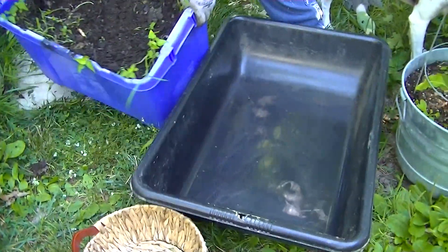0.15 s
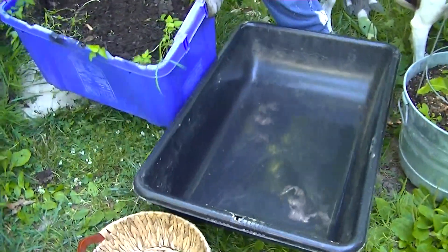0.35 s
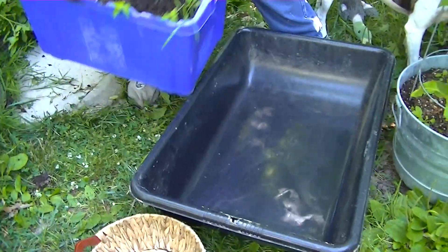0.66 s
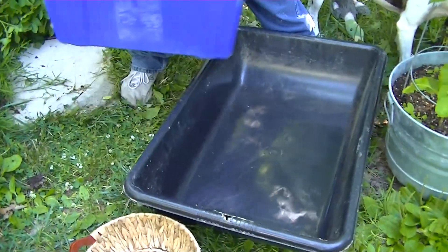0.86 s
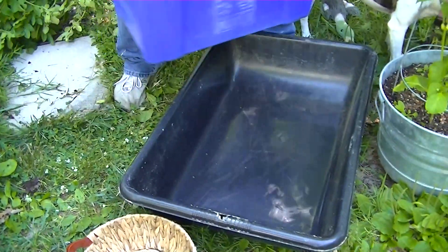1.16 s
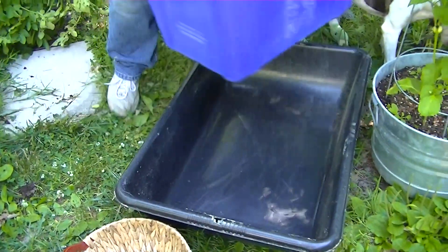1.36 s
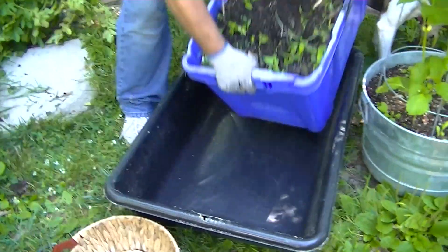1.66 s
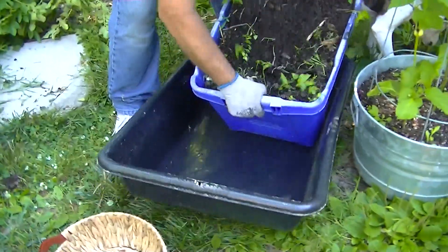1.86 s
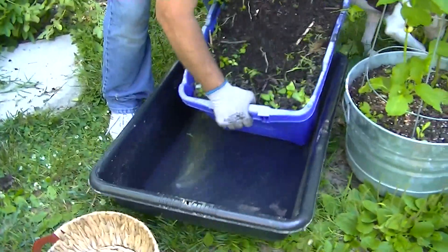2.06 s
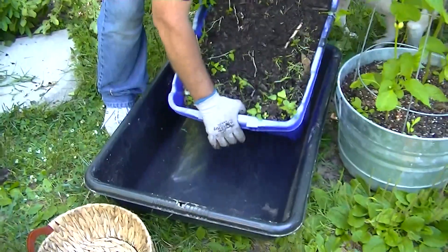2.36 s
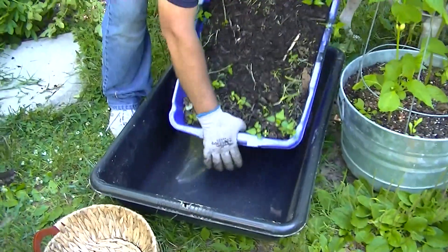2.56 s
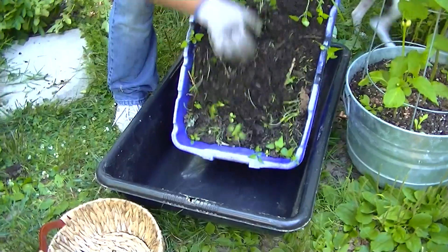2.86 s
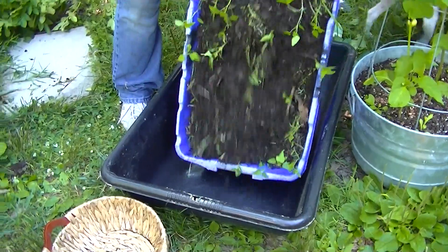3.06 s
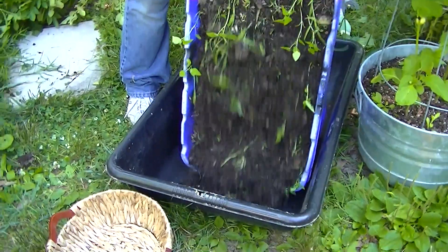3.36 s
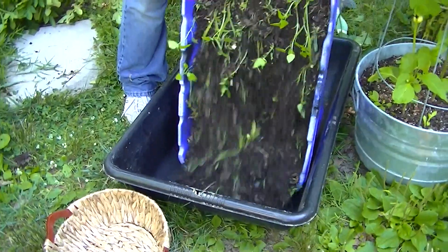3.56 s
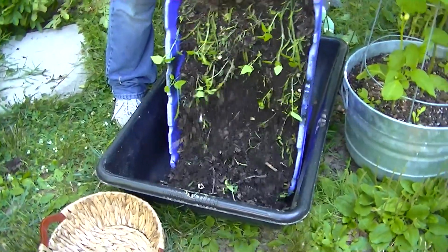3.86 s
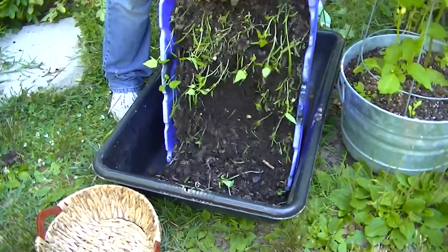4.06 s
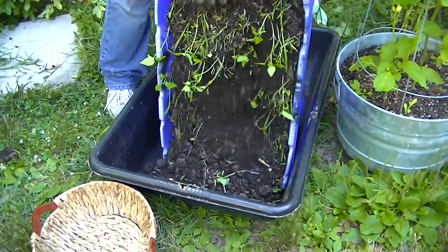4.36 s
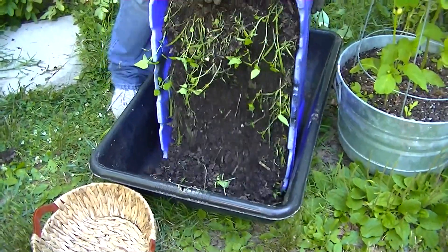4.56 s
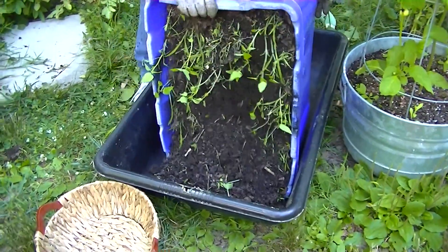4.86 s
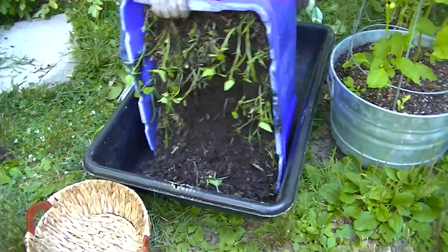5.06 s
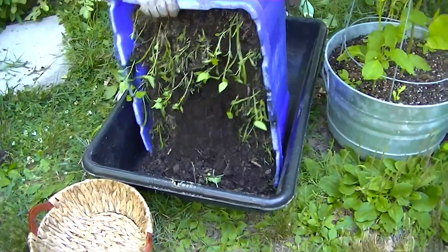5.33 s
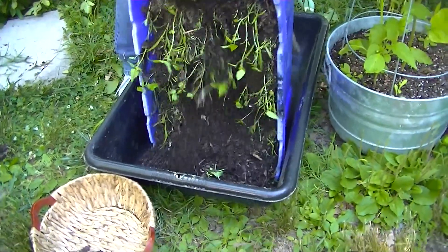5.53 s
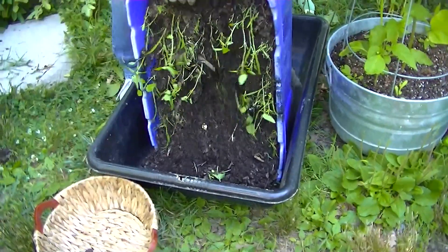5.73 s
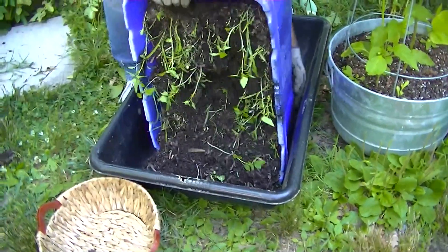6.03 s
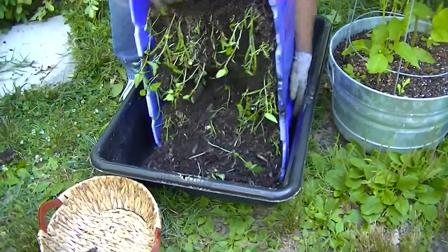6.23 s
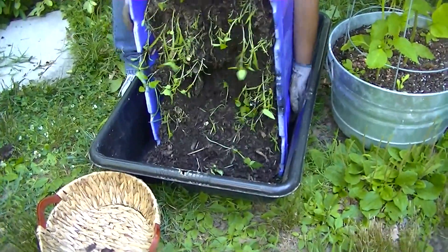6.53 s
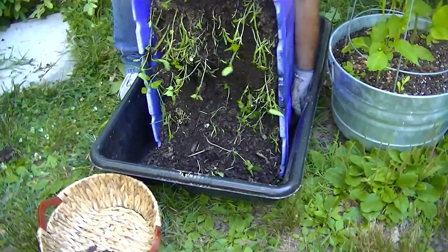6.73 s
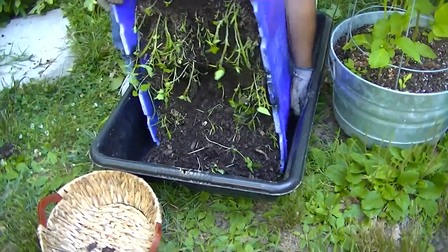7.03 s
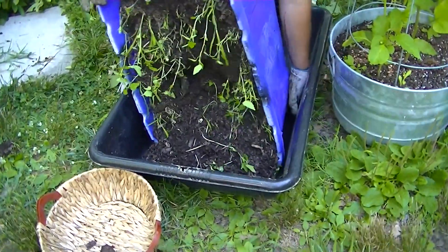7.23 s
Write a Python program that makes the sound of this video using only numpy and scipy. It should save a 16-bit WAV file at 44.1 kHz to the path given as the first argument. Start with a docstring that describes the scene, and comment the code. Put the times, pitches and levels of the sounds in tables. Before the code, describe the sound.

A plastic tote of soil bumps and thuds heavily into a plastic tub, then soil and stems slide out rustling, with one loud plastic crack.

```python
"""Tipping out soil in a garden

Close up on a lawn, a plastic tote of soil and weeds is lifted, set down in a plastic tub and tipped out.
The tub thuds as decaying wall modes, soil and stems rustle as coloured grains, and pebbles tick on the walls.
The flexing tote snaps, loudest in one crack, and scattered echoes ring around the garden.
Behind it lie still air, as shaped noise, and the wavering hum of a far machine."""
import sys
import numpy as np
from scipy import signal
from scipy.fft import rfft, irfft, next_fast_len
from scipy.io import wavfile

SR = 44100
rng = np.random.default_rng(int(sys.argv[2]) if len(sys.argv) > 2 else 0)


def put_to_file(sound):
    """Save the sound as 16-bit audio at rate SR, in the file named by the first command-line argument."""
    columns = np.atleast_2d(sound).T  # one column per channel
    safe = np.clip(columns, -1, 1)
    whole_steps = np.round(safe * 32767)
    wavfile.write(sys.argv[1], SR, whole_steps.astype(np.int16))


N = 325899
TIME = np.arange(N) / SR

# Background of the open garden. Each row: frequency in Hz, relative density in dB per Hz.
GARDEN_SPECTRUM = [(20, -14.5), (60, 0), (110, -2), (180, -7.5), (240, -7.5), (340, -4.5), (560, -10.5),
                   (820, -4), (1300, -11), (2400, -14), (4500, -17.5), (7000, -23), (11000, -37),
                   (15500, -35.5)]
GARDEN_DB, HUM_HZ, HUM_DB = -60, 119.7, -69.5

# The load gives way: lifted, landed, tipped, the bulk falling, trickling, jolted, shaken twice.
# Each row: start in seconds, hold in seconds, drain in dB per second, then levels in dB
# of leaves and crumbs, of soil, and of weight shifting against the walls.
LOAD_SLIDES = [(-.15, 0.11, 20, -67.5, -62, -59), (1.75, .02, 30, -60, -59, -56),
               (2.879, 0.631, 17, -57, -63, -64.5), (3.071, .13, 53, -62.5, -55, -57),
               (4.031, 0.11, 2.5, -62.5, -65.5, -67.5), (4.969, 0.184, 12.5, -57.5, -62, -76),
               (5.982, 0.37, 54.5, -62, -64, -67), (6.992, 0.31, 30, -63.5, -68, -76)]
SWELL_S = 0.1477
# The load never quite rests in the hands.
STIR_LEAVES_DB, STIR_SOIL_DB, STIR_WEIGHT_DB = -69.5, -72.5, -78.5
# Brief strokes of stems and soil over the plastic.
# Each row: start in seconds, length in seconds, leaves in dB, soil in dB.
PLASTIC_SWISHES = [(0.108, 0.124, -67.5, -62.5), (0.327, 0.113, -68, -68), (0.425, 0.084, -72.5, -51.5),
                   (1.286, 0.186, -62, -70), (1.457, 0.0925, -65.5, -67.5), (2.0, 0.1197, -65, -59),
                   (2.552, 0.075, -63.5, -73.5), (3.018, 0.085, -66.5, -55), (4.322, 0.1643, -54.5, -62.5),
                   (5.886, 0.0687, -57.5, -57), (5.915, 0.228, -61.5, -88), (6.14, 0.123, -68.5, -65),
                   (6.561, 0.0338, -59, -58.5), (6.76, 0.1585, -58.5, -60.5), (6.957, 0.0976, -63, -83.5),
                   (7.105, .18, -62, -71.5)]
# Colour of the weight shifting. Each row: frequency in Hz, relative density in dB per Hz.
SHIFT_SPECTRUM = [(40, -26.5), (140, -9), (230, -2.5), (320, -0.5), (480, -7), (900, -16), (3000, -36)]
# Colour of the soil grains. Each row: frequency in Hz, relative density in dB per Hz.
SOIL_SPECTRUM = [(150, -28), (500, -4), (1100, -2), (1650, 0.5), (2000, -1), (2450, -12), (3100, 0),
                 (3900, -15.5), (6000, -10), (15000, -44)]
# Colour of leaves and crumbs. Each row: frequency in Hz, relative density in dB per Hz.
LEAF_SPECTRUM = [(400, -40), (2000, -3), (4000, -3.5), (5500, -0.5), (7200, 1.5), (9000, -2), (11500, -5),
                 (15500, -16.5)]
# Fast soil makes the tote floor sing: at SING_EVEN_DB of soil, song and grains are equally loud;
# the song's level against the grains follows the soil gain to the power SING_EXPONENT.
SING_HZ, SING_WIDTH_HZ, SING_EVEN_DB, SING_EXPONENT = 1580, 480, -51.5, 1.15
# Small stones falling at random: rate, and level against leaves and crumbs.
GRIT_PER_S, GRIT_DB = 39, -14.5

# Dull blows on the tub. Each row: start in seconds, level in dB, bass in dB and treble in dB
# against the middle, pitch as a factor on the modes.
TUB_THUDS = [(0.135, -22.5, 2.5, -11, 1.1), (0.431, -18, -7.5, -21.5, 0.47), (.463, -19, -4, -24, 1.235),
             (0.494, -20, 4, -14, 1.077), (0.6463, -12.5, -2, -32, 0.73), (.654, -18, -1, -28, 1.5),
             (1.084, -26.5, -3, -11.5, 1.24), (1.7211, 8.4, 2, -20, 0.991), (1.7426, 2.5, -7, -26, 1.21),
             (1.756, -0.5, -11, -17.5, 1.15), (1.777, -7, 1.5, -2.5, 1.15), (1.794, -12, 5, -23.5, 1.1),
             (1.813, -17, -3.5, -20, 1.1), (1.995, -18, -3, 0, .95), (3.0102, -20, -14.5, -6.5, 1.9),
             (3.647, -17, 3.5, -20, 1.136), (3.873, -22.5, -6.5, -21, 1.3),
             (3.926, -19.5, -6.5, -9.5, 1.187), (5.174, -10, 6, -12, 1.05), (5.592, -22.5, 10, -4.5, 1.187),
             (5.919, -22, -0.5, -12, 1.08), (6.188, -22.5, -4.5, -1, 1.34), (6.545, -29, 5, -10.5, 0.736)]
# Modes of the loaded tub at pitch 1. Each row: frequency in Hz, level in dB, t60 in seconds.
TUB_MODES = [(92, -5.5, 0.056), (215, -48.5, 0.041), (267.9, 5.5, 0.0637), (348, -1.5, 0.04),
             (502, -2.5, 0.0482), (602.3, -4.5, 0.0565), (702.4, -2, 0.0314), (1015.4, -10.5, 0.0864),
             (1137, -21.5, 0.025), (1473, -9, 0.03)]
# A heavy blow presses the load on the wall: rattle t60 at 0 dB, and the rise in level that halves it.
TUB_RATTLE_S, CHOKE_HALVING_DB = .033, 19

# The tote rubs over the rim of the tub. Each row: start in seconds, length in seconds, level in dB.
RIM_SCRAPES = [(.44, .09, -57), (0.481, .3, -63), (.572, 0.038, -61)]
# Resonances of the rubbed wall. Each row: frequency in Hz, width in Hz, level in dB.
WALL_RESONANCES = [(326, 125, -7), (1440, 70, -3), (2475, 128, -0.5), (3117, 210, -14.5)]

# The tub rocks on the turf. Each row: start in seconds, length in seconds, frequency in Hz, level in dB.
TURF_BOUNCES = [(.65, 0.059, 150.8, -49.5), (1.716, 0.1126, 89.8, -38)]

# Sharp snaps of the tote wall. Each row: start in seconds, level in dB, bass in dB and treble in dB
# against the middle, rattle t60 in seconds, contact click in dB, pitch as a factor on the modes.
TOTE_SNAPS = [(1.7554, -13.5, -2, 2.5, .06, -3, 1.11), (1.765, -12.5, 0, 8, 0.044, -1, 0.57),
              (1.7685, 3.5, -24, -9, 0.057, 2.5, .92), (1.7891, -14, 2, 4.5, 0.113, 3.5, 0.71),
              (4.6978, -9.5, -34, 2.5, .05, -3, 1.47), (5.1597, 12.3, -19, -6.8, .015, 5.5, 1.01),
              (5.2035, 2, -20, 9, .024, -4, 0.98), (5.207, -6.5, -13, 0, .04, -1.5, 1.66)]
# Modes of the tote wall at pitch 1. Each row: frequency in Hz, level in dB, t60 in seconds.
TOTE_MODES = [(299.5, -6.5, 0.0326), (645, -21.5, 0.05), (920, -5.5, 0.0426), (1639, 4.5, 0.0237),
              (2032, 9, 0.0211), (2250, -13, 0.028), (3100, -10.5, 0.045), (3500, -4, 0.031),
              (4520, 4.5, 0.021), (5377, -8.5, 0.0138), (5481, 7.5, 0.032), (6540, 4.5, 0.0163),
              (7810, 7, .012)]

# Larger pebbles and clods ticking on the plastic.
# Each row: start in seconds, level in dB, treble in dB against the middle.
PEBBLE_TICKS = [(1.89, -19.5, -0.5), (1.899, -23, -21), (2.261, -30, 20.5), (2.614, -28, -2),
                (2.701, -28, -32), (3.046, -17.5, 11.5), (3.138, -16, -13), (3.254, -14.5, 0),
                (3.28, -14.5, -10), (3.389, -19.5, -9.5), (3.457, -19.5, -9), (3.62, -20.5, -8),
                (3.749, -23, 22), (3.873, -23.5, -24.5), (3.917, -19, -10), (4.063, -19, 1),
                (4.227, -26, -27), (4.766, -18, -12), (5.078, -28, 18.5), (5.113, -17, -1),
                (5.369, -23.5, 14), (5.386, -22.5, -5.5), (6.581, -22, -9), (6.736, -29, -10)]
TICK_RATTLE_S = .038

# Decay of the scatter from fences and foliage. Each row: frequency in Hz, t60 in seconds.
YARD_T60 = [(100, 0.67), (300, 0.1043), (1000, 0.5028), (2500, .5), (6000, 0.28), (12000, 0.02)]
# Strength of that scatter. Each row: frequency in Hz, level in dB.
YARD_LEVEL = [(80, -12), (300, -10.5), (900, -13), (1450, -15), (2050, -15.5), (2800, -11.5), (5000, -9),
              (8000, -13), (15000, -11.5)]

# Slight phase difference between the two microphone ports.
# Each row: frequency in Hz, side against mid in dB.
PORT_DIFFERENCE = [(100, -32.5), (1000, -49), (2200, -24.5), (5000, -23.5), (9000, -41), (15000, -46)]
EDGE_HZ = 15950  # upper band limit


def amp(db):
    """Turns decibels into an amplitude factor."""
    return 10 ** (np.asarray(db) / 20)


def evened(x):
    """Scales to rms 1."""
    return x / np.sqrt(np.mean(x ** 2) + 1e-20)


def unit(x):
    """Scales to energy 1."""
    return x / (np.linalg.norm(x) + 1e-20)


def read(points, hz):
    """Joins (Hz, value) points on a log-frequency axis."""
    f, value = np.transpose(points)
    return np.interp(np.log(hz + 1), np.log(f + 1), value)


def coloured(x, spectrum):
    """Weights x by a spectrum, at rms 1."""
    size = next_fast_len(N)
    gain = amp(read(spectrum, np.fft.rfftfreq(size, 1 / SR)))
    return evened(irfft(rfft(x, size) * gain, size)[:N])


def band(x, hz, kind, order=2):
    """Causal filter, so that attacks stay sharp."""
    return signal.sosfilt(signal.butter(order, hz, kind, fs=SR, output="sos"), x)


def add(mix, s, sound):
    """Lays a sound into the mix from s seconds on, cut at the end of the mix."""
    part = mix[round(s * SR):][:len(sound)]
    part += sound[:len(part)]


def garden():
    """Still outdoor air as shaped noise, with a far machine humming at a slowly wavering pitch."""
    air = coloured(rng.standard_normal(N), GARDEN_SPECTRUM)
    drift = coloured(rng.standard_normal(N), [(1, -1.5), (4, -12.5), (20, -79.5)])
    waver_hz = 0.672 * drift
    hum = np.sin(2 * np.pi * np.cumsum(HUM_HZ + waver_hz) / SR)
    return amp(GARDEN_DB) * air + amp(HUM_DB) * evened(hum)


def grains(per_s, spread_db, wash):
    """Tiny contacts of very unequal size over a wash of countless smaller ones."""
    sizes = amp(spread_db * np.minimum(rng.exponential(1, N), 5))
    signs = rng.choice([-1., 1.], N)
    clicks = sizes * signs * (rng.random(N) < per_s / SR)
    return evened(clicks) + wash * rng.standard_normal(N)


def clumps(depth_db):
    """Soil lets go in uneven lumps, some tens a second: a random gain of depth_db rms."""
    unevenness = [(1, -20), (12, 0), (60, -4), (160, -25), (600, -80)]
    return amp(depth_db * coloured(rng.standard_normal(N), unevenness))


def rubbing():
    """Uneven little slips of grit over plastic."""
    return grains(per_s=500, spread_db=3, wash=.8)


def resonate(x, hz, width_hz):
    """One steep resonance of the wall, a peak filter run twice, at rms 1."""
    wall = signal.iirpeak(hz, hz / width_hz, SR)
    once = signal.lfilter(*wall, x)
    return evened(signal.lfilter(*wall, once))


def blow(modes, pitch, bass_db, treble_db, t60, rattle_db, click_db, top_hz):
    """A contact click, the main modes of the wall, and a rattle of dense higher ones as decaying noise."""
    t = np.arange(SR // 4) / SR
    ring = sum(amp(db - 60 * t / life) * np.cos(2 * np.pi * hz * pitch * t) for hz, db, life in modes)
    rattle = band(rng.standard_normal(len(t)) * amp(-60 * t / t60), 300, "high", order=1)
    click = t == 0
    hit = unit(ring) + amp(rattle_db) * unit(rattle) + amp(click_db) * click
    # weight brings out the bass, hardness the treble
    bass = unit(band(band(hit, 333, "low", order=3), 104, "high"))
    middle = unit(band(band(hit, 632, "high", order=3), top_hz * 0.2915, "low", order=4))
    treble = unit(band(band(hit, 4430, "high", order=3), top_hz, "low", order=4))
    return unit(amp(bass_db) * bass + middle + amp(treble_db) * treble)


def pebble(treble_db):
    """One stone on the wall; each spot rings at its own pitch, and the harder the stone, the brighter."""
    pitch = 0.74 + 0.168 * rng.uniform(-0.973, 1)
    return blow(TOTE_MODES, pitch, -19.0, treble_db, TICK_RATTLE_S, rattle_db=7.5, click_db=-16, top_hz=10280)


def grit(count):
    """Small stones of several kinds, soft to hard, patter at random; rms 1."""
    patter = np.zeros(N)
    kinds = [pebble(treble_db) for treble_db in np.linspace(-4, 22, count)]
    for kind in kinds:
        falls = grains(GRIT_PER_S / count, spread_db=2.5, wash=0)
        patter += signal.oaconvolve(falls, kind)[:N]
    return evened(patter)


def slide(start, hold, drain_db_per_s):
    """Gain over time of one slide: it swells, holds, and drains away."""
    age = TIME - start
    swell = np.clip(age / SWELL_S, 0, 1)
    return swell * amp(-drain_db_per_s * np.maximum(age - SWELL_S - hold, 0))


def load():
    """Gains over time of leaves, soil and shifting weight; the slides add in power."""
    power = amp([[STIR_LEAVES_DB], [STIR_SOIL_DB], [STIR_WEIGHT_DB]]) ** 2
    for start, hold, drain_db_per_s, leaf_db, soil_db, weight_db in LOAD_SLIDES:
        levels = amp([[leaf_db], [soil_db], [weight_db]])
        power = power + (levels * slide(start, hold, drain_db_per_s)) ** 2
    return np.sqrt(power)


def pouring():
    """The load shifts, soil grains scrape down the wall, and leaves and crumbs rustle."""
    leaf_gain, soil_gain, weight_gain = load()
    stones = amp(GRIT_DB) * grit(count=8) * leaf_gain  # the brief strokes below carry no stones
    for s, length, leaf_db, soil_db in PLASTIC_SWISHES:
        stroke = signal.windows.tukey(round(length * SR), .7)
        add(soil_gain, s, amp(soil_db) * stroke)
        add(leaf_gain, s, amp(leaf_db) * stroke)
    shifting = grains(per_s=200, spread_db=3, wash=.6) * clumps(3)
    soil_grains = grains(per_s=600, spread_db=3.4, wash=.6) * clumps(2.2)
    leaf_grains = grains(per_s=3000, spread_db=3.6, wash=1) * clumps(.8)
    shift = coloured(shifting, SHIFT_SPECTRUM) * weight_gain
    soil = coloured(soil_grains, SOIL_SPECTRUM) * soil_gain
    leaves = coloured(leaf_grains, LEAF_SPECTRUM) * leaf_gain
    song_gain = soil_gain * (soil_gain / amp(SING_EVEN_DB)) ** SING_EXPONENT
    song = resonate(rubbing(), SING_HZ, SING_WIDTH_HZ) * song_gain
    return shift + song + stones + soil + leaves


def tub():
    """The heavy tote bumps the tub and lands in it, and big clods follow: cushioned blows on its modes."""
    out = np.zeros(N)
    for s, db, bass_db, treble_db, pitch in TUB_THUDS:
        t60 = TUB_RATTLE_S * 2 ** (-db / CHOKE_HALVING_DB)
        thud = blow(TUB_MODES, pitch, bass_db, treble_db, t60, rattle_db=-5.5, click_db=-17.5, top_hz=9350)
        # the soil cushions the contact, so the force builds up over about a millisecond
        cushion = 1 - np.exp(-np.arange(len(thud)) / SR / 0.000895)
        add(out, s, amp(db) * unit(thud * cushion))
    return out


def scrapes():
    """Grit slipping over plastic sets narrow resonances of the wall going."""
    pressure, slips = np.zeros(N), rubbing()
    for s, length, db in RIM_SCRAPES:
        add(pressure, s, amp(db) * signal.windows.tukey(round(length * SR), .6))
    wall = sum(amp(db) * resonate(slips, hz, width_hz) for hz, width_hz, db in WALL_RESONANCES)
    return pressure * evened(wall)


def bounce():
    """A few deep cycles, swelling and fading, as the tub settles into the grass."""
    out = np.zeros(N)
    for s, length, hz, db in TURF_BOUNCES:
        t = np.arange(round(length * SR)) / SR
        envelope = np.sin(np.pi * t / length)
        add(out, s, amp(db) * envelope * np.sin(2 * np.pi * hz * t))
    return out


def tote():
    """The thin wall buckles and snaps under its load, ringing in its own modes."""
    out = np.zeros(N)
    for s, db, bass_db, treble_db, t60, click_db, pitch in TOTE_SNAPS:
        snap = blow(TOTE_MODES, pitch, bass_db, treble_db, t60, rattle_db=2, click_db=click_db, top_hz=10830)
        add(out, s, amp(db) * snap)
    return out


def pebbles():
    """The larger stones and clods strike the walls one by one."""
    out = np.zeros(N)
    for s, db, treble_db in PEBBLE_TICKS:
        add(out, s, amp(db) * pebble(treble_db))
    return out


def yard(x):
    """Fences and foliage scatter echoes of random sign, each band dying at its own speed."""
    out = np.zeros(N)
    # two sets of echoes take the sound in turn, which blurs its resonances into a diffuse tail
    turn = 2 * np.pi * 130 * TIME
    for share in (np.cos(turn), np.sin(turn)):
        signs = rng.choice([-1., 1.], SR)
        chosen = rng.random(SR) < 5000 / SR  # echoes per second
        taps = signs * chosen * (np.arange(SR) > .005 * SR)  # none within the first 5 ms
        hz, t, z = signal.stft(evened(taps), SR, nperseg=256)
        t60 = read(YARD_T60, hz)[:, None]
        decay = amp(read(YARD_LEVEL, hz)[:, None] - 60 * t / t60)
        # long and short decays get the same energy before their level
        z = z * decay * np.sqrt(np.log(10 ** 6) / (t60 * SR))
        echoes = signal.istft(z, SR, nperseg=256)[1]
        out += signal.fftconvolve(x * share, echoes)[:N]
    return out


def scene():
    """Everything lies almost straight ahead of the microphone, so left and right are nearly alike."""
    near = pouring() + tub() + scrapes() + bounce() + tote() + pebbles()
    mid = near + yard(near) + garden()
    # a quarter-cycle shift makes the side a phase difference between the ports
    port_gain = amp(read(PORT_DIFFERENCE, np.fft.rfftfreq(N, 1 / SR)))
    side = irfft(1j * rfft(mid) * port_gain, N)
    side = side + amp(-74.5) * coloured(rng.standard_normal(N), GARDEN_SPECTRUM)
    return np.array([amp(-.2) * (mid + side), mid - side])


def record(dry):
    """Peaks beyond full scale clip; then a steep low-pass limits the band."""
    clipped = np.clip(dry, -1, 1)
    lowpass = signal.firwin(511, EDGE_HZ, window=("kaiser", 8), fs=SR)
    return signal.oaconvolve(clipped, lowpass[None], "same")


dry = scene()
out = record(dry)
put_to_file(out)
```